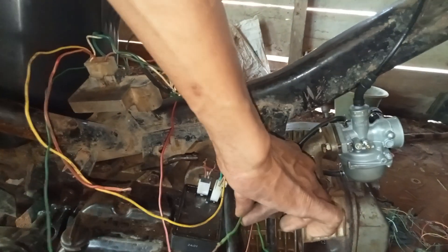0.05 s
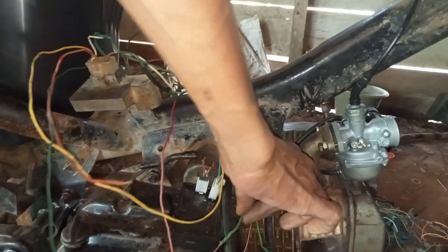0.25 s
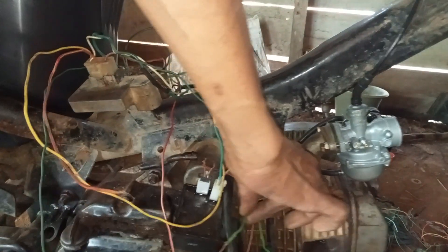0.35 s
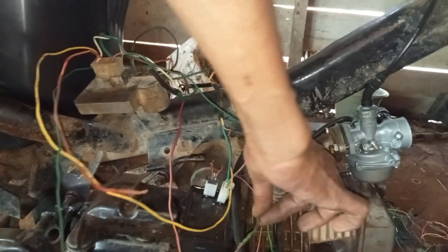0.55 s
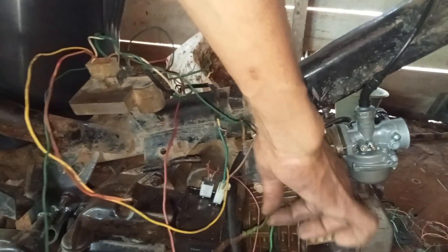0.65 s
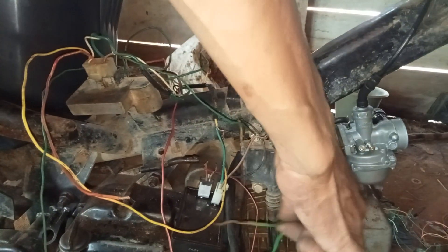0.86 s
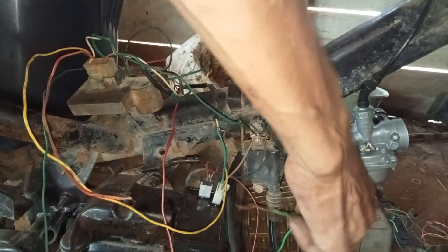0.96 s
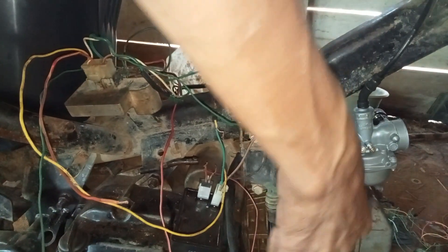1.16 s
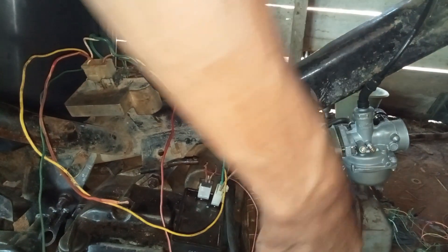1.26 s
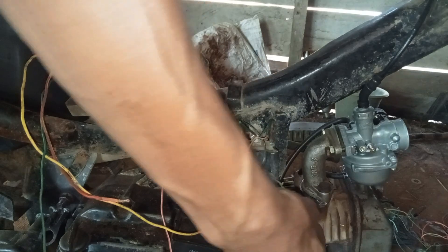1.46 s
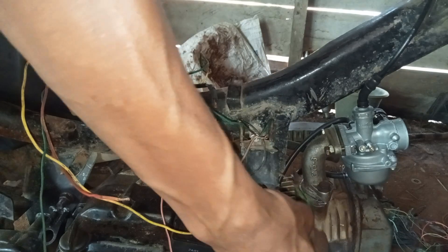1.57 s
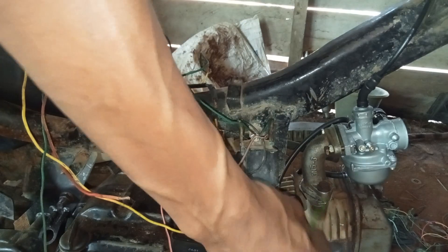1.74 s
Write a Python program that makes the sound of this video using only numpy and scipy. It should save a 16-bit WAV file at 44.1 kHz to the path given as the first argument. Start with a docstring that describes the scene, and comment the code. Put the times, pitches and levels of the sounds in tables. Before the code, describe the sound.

A hand rubs and scrapes on motorcycle parts close to the microphone, with a light tap at 0.1 s and the strongest dull scuffing from 0.25 to 0.45 s. Quick bright swishes come at 0.27 and 0.44 s, clicks with hollow pops at 0.46, 0.57 and 0.72 s. A faint knock follows near 1 s, soft brushing around 1.6 s. Crickets and a thin high whine continue throughout in quiet shed air.

```python
"""A hand works among the wires of a stopped motorcycle in an open shed, close to the microphone.
Shaped friction noise rubs and hisses, wobbling whistles swish, and noisy arched tones squeak twice.
Clicks tick, decaying sines and noise make hollow pops and light knocks, and a low sine thrums.
Behind the hand, narrow noise bands make an unbroken insect chorus, a thin high whine wavers
on a few sine partials, and soft noise is the still air; both channels are alike."""
import sys
import numpy as np
from scipy import signal
from scipy.fft import rfft, irfft
from scipy.io import wavfile

SR = 44100
rng = np.random.default_rng(int(sys.argv[2]) if len(sys.argv) > 2 else 0)


def bounce(signal):
    """Save signal as a 16-bit WAV file at the path given by the first command-line argument."""
    frames = np.transpose(np.atleast_2d(signal))
    limited = np.clip(frames, -1, 1)
    pcm = np.round(limited * 32767).astype(np.int16)
    wavfile.write(sys.argv[1], SR, pcm)


N = 79380
T = np.arange(N) / SR  # s

# dull rubbing of the hand, close: t/s, level/dB
RUB_LEVEL = [(0, -46), (.08, -57.5), (.15, -50), (.185, -54.5), (.215, -47.5), (.245, -36), (.385, -31),
             (.425, -35), (.485, -40), (.528, -39.5), (.545, -47.5), (.562, -47), (.58, -44), (.62, -43.5),
             (.71, -43.5), (.79, -50), (.875, -51.5), (.93, -64), (1.1, -67), (1.22, -100)]
# its spectrum: f/Hz, relative level/dB (per Hz, as in all noise spectra here)
RUB_COLOUR = [(60, -23), (120, -4.5), (170, -5), (230, -3.5), (360, -4), (480, -2.5), (700, 3),
              (1000, -2.5), (1450, -4), (1950, -11), (3300, -8), (5000, -16.5), (9000, -22)]
# dry hiss of sliding skin: t/s, level/dB
HISS_LEVEL = [(0, -49.5), (.06, -72), (.14, -60), (.19, -45), (.235, -49.5), (.27, -42), (.325, -42.5),
              (.37, -36), (.42, -40.5), (.465, -40.5), (.495, -38), (.535, -38.5), (.543, -56), (.563, -70),
              (.572, -42), (.605, -45), (.65, -54), (.685, -44.5), (.73, -57), (.77, -50.5), (.81, -61),
              (.95, -84)]
# its spectrum: f/Hz, relative level/dB
HISS_COLOUR = [(2500, -2.5), (5200, -15.5), (7400, -2), (8500, -2.5), (9600, 0.5), (10600, -8),
               (12500, -5.5), (14200, -20), (15500, -2), (16500, -23)]
# a later light brush of the hand: t/s, level/dB
BRUSH_LEVEL = [(1.42, -100), (1.47, -84), (1.5, -62), (1.53, -71), (1.585, -67.5), (1.607, -56),
               (1.65, -61.5), (1.695, -58.5), (1.73, -64.5), (1.8, -82)]
# its spectrum: f/Hz, relative level/dB
BRUSH_COLOUR = [(100, -7.5), (500, -2), (900, -6.5), (1600, -1.5), (3800, -5.5), (7000, -9), (14000, -26.5)]
# slips: rate, mean excess of their size, share of the friction's power
GRAINS_PER_S, GRAIN_SPREAD_DB, GRAIN_SHARE = 1800, 3, .55
# uneven contact: rms swing in each half octave, and its pace
PATCHY_DB, PATCHES_HZ = 2.5, 14.6
# short scuffs: t/s, half length/s, centre f/Hz, width of each filter pass/Hz, level/dB
SCUFFS = [(0.037, .025, 588, 344, -57), (0.198, 0.033, 324, 220, -42), (0.253, 0.011, 316, 197, -32.5),
          (0.516, 0.0057, 2760, 3460, -35.5), (0.516, 0.011, 418, 196, -41.5),
          (0.641, 0.01, 493, 495, -46.5), (.708, 0.0052, 604, 222, -37), (0.823, 0.0039, 2500, 3000, -54),
          (0.867, 0.0017, 8500, 4500, -44), (0.879, 0.021, 510, 586, -54.5), (0.926, 0.06, 200, 130, -57),
          (1.038, 0.11, 3010, 704, -65), (1.136, 0.045, 190, 150, -69.5)]

# low thrum of the rubbed body: t/s, level/dB
THRUM_LEVEL = [(0, -52.5), (.07, -73.5), (.13, -59.5), (.24, -47), (.27, -61), (.3, -37.5), (.35, -57),
               (.38, -50), (.415, -36.5), (.45, -48.5), (.53, -48), (.56, -63), (.7, -81), (.8, -70),
               (.87, -56.5), (.96, -63), (1.2, -85)]
THRUM_HZ, THRUM_WANDER_HZ, THRUM_PACE_HZ = 160.6, 5.4, 41  # centre, rms pitch wander, its pace
# soft bumps: t/s, half length/s, f/Hz, level/dB
BUMPS = [(0.873, 0.023, 108.2, -53), (1.195, 0.024, 99, -69), (1.49, .018, 100, -59),
         (1.77, 0.033, 230.6, -65)]

# quick swishes: t/s, half length/s, centre f/Hz, level/dB
SWISHES = [(0.2721, 0.0058, 7320, -20), (0.309, .009, 7420, -29.5), (.341, .002, 9630, -30),
           (0.35, 0.0032, 9620, -29.5), (0.395, 0.0061, 7400, -27.5), (0.4416, 0.0054, 7610, -15.5),
           (0.447, 0.0032, 7740, -19.5), (0.478, 0.012, 7400, -36), (0.691, 0.019, 7200, -48)]
# whistles within each swish: ratio to the centre, wobble rate/Hz, relative level/dB
SWISH_MODES = [(.85, 585, -7), (.93, 400, -3), (1.002, 348, 4.5), (1.05, 301, -4), (1.19, 302, -10.5),
               (1.29, 402, -27)]
# hiss around the whistles: f/Hz, relative level/dB
SWISH_COLOUR = [(2000, -6.5), (5000, -7.5), (7500, -2.5), (9600, 3), (11000, -12), (14000, -13),
                (15700, -8)]
SWISH_HISS_DB, SWISH_RISE_HZ_PER_S = -8.5, 8700  # hiss against whistles; glide of the centre

# faint squeaks: t/s, top f/Hz, level/dB
SQUEAKS = [(0.195, 14850, -47), (0.763, 15500, -46.5)]
SQUEAK_HALF_S, SQUEAK_SAG_HZ = .02, 2360  # the pitch is down by the sag one half length from the top
SQUEAK_ROUGHNESS_HZ = 340  # pace of the loudness wobble

# sharp ticks: t/s, drive level before the colour/dB
TICKS = [(0.456, -11.5), (.5635, -11), (0.7169, -26.5)]
# their filter: f/Hz, gain/dB
TICK_COLOUR = [(500, -14), (1800, -9.5), (3800, 4), (6000, -7), (9500, 9), (12500, -4), (16000, 4.5)]
TICK_TAIL_DB, TICK_T60_S = -10.5, 0.022
# hollow pops just after the ticks: t/s, f/Hz, level/dB, ring T60/s
POPS = [(.4595, 714, -20, 0.034), (.569, 1677, -23, 0.034), (.7252, 702, -15.5, 0.036)]
# filter of their thud: f/Hz, gain/dB
POP_COLOUR = [(200, -24), (700, -12), (1400, 3.5), (2200, -23), (5000, -35)]
POP_RISE_S, POP_THUD_DB, POP_THUD_T60_S = 0.0012, 1.5, 0.022
# a light knock: t/s, level/dB
KNOCKS = [(.987, -44)]
# modes of the knocked part: f/Hz, relative level/dB, T60/s
KNOCK_MODES = [(806, -15, .12), (944, -14, .07), (1090, -9, .06), (1184, -9, 0.23), (1333, -7, 0.088),
               (1444, -2.5, 0.13), (1520, -6, .1), (1599, -18.5, 0.36)]
# a smaller part pings: t/s, level/dB
PINGS = [(.112, -42)]
# modes of the smaller part: f/Hz, relative level/dB, T60/s
PING_MODES = [(1060, 0, 0.079), (1690, 1.5, 0.076), (1870, -11, 0.032)]
# filter of the crack in knock and ping: f/Hz, gain/dB
KNOCK_COLOUR = [(300, -9), (650, -8), (850, 4), (1450, -5), (2200, -15), (4500, -21), (8000, -45)]
KNOCK_CRACK_DB, KNOCK_CRACK_T60_S = 10.5, 0.052

# cricket chorus behind the hand: t/s, level/dB
CRICKET_LEVEL = [(0, -42.5), (.28, -37.5), (.55, -47), (.75, -46), (.87, -43.5), (1.15, -40.5),
                 (1.22, -46.5), (1.33, -39), (1.5, -44), (1.57, -40.5), (1.67, -43.5), (1.8, -40.5)]
# its song band: f/Hz, relative level/dB
CRICKET_COLOUR = [(4150, -31.5), (4330, -14), (4420, 2), (4500, 5.5), (4680, 0.5), (4770, -8), (4880, -28)]
# fainter insects farther off: f/Hz, width of each filter pass/Hz, level/dB
FAR_INSECTS = [(3620, 300, -68), (5290, 450, -63.5), (7030, 750, -64), (8200, 270, -77), (9500, 1500, -68)]

# thin whine: t/s, fundamental f/Hz, level/dB
WHINE = [(0, 1640, -52), (.1, 1640, -73), (.3, 1677, -52), (.7, 1625, -60), (.805, 1620, -65),
         (.825, 1630, -56.5), (.89, 1636, -57.5), (1.01, 1630, -61.5), (1.06, 1634, -63.5),
         (1.24, 1635, -62), (1.32, 1636, -57.5), (1.49, 1630, -57), (1.531, 1615, -60), (1.59, 1620, -56.5),
         (1.66, 1614, -63.5), (1.71, 1630, -57), (1.78, 1635, -58)]
# its partials: multiple of the fundamental, relative level/dB
WHINE_PARTIALS = [(4, -14.5), (6, -5.5), (8, 1.5)]
# faint lines beside the strongest partial: offset/Hz, level/dB
WHINE_NEIGHBOURS = [(-330, -68), (374, -77)]
WHINE_JITTER, WHINE_FLUTTER_DB = 0.00093, 2.5  # rms share of the pitch; rms swing of each partial
# partials of the whine that swell briefly by themselves: t/s, half length/s, f/Hz, level/dB
WHINE_SWELLS = [(1.116, 0.039, 11320, -71), (1.276, 0.04, 11370, -68), (1.307, .02, 3275, -70),
                (1.5, 0.038, 11430, -67), (1.523, 0.032, 3250, -65), (1.63, 0.05, 11470, -68),
                (1.745, 0.027, 3240, -68), (1.76, .03, 11470, -72)]
SWELL_JITTER = .0015  # rms share of the pitch

# still air of the shed: f/Hz, relative level/dB
AIR_COLOUR = [(25, -27), (55, -12.5), (98, 2.5), (150, -4.5), (260, -13), (500, -13), (750, -16.5),
              (1200, -20.5), (2300, -24.5), (3200, -19), (6000, -25), (11000, -29), (14500, -23.5),
              (16000, -32)]
AIR_DB = -63
CUTOFF_HZ = 15800


def rubbing():
    """Friction gives a dull scuffing, a dry hiss and a later light brush."""
    layers = [(RUB_LEVEL, RUB_COLOUR), (HISS_LEVEL, HISS_COLOUR), (BRUSH_LEVEL, BRUSH_COLOUR)]
    return sum(level(curve) * rms_one(colour(patchy(friction()), spectrum))
               for curve, spectrum in layers)


def friction():
    """Tiny slips of uneven size on a bed of smooth noise."""
    size_db = GRAIN_SPREAD_DB * np.minimum(rng.exponential(1, N), 5)
    sizes = from_db(size_db) * rng.choice([-1, 1], N)
    slips = rms_one(sizes * (rng.random(N) < GRAINS_PER_S / SR))
    bed = rng.standard_normal(N)
    return np.sqrt(GRAIN_SHARE) * slips + np.sqrt(1 - GRAIN_SHARE) * bed


def patchy(x):
    """The contact keeps changing, so each half octave swells and fades by itself."""
    half_octave = 2 * np.log2(np.fft.rfftfreq(N, 1 / SR) + 1)
    spectrum = rfft(x)
    out = np.zeros(N)
    for k in range(10, 30):
        # neighbouring triangles overlap and add up to one
        part = irfft(spectrum * np.maximum(1 - np.abs(half_octave - k), 0), N)
        out += part * from_db(PATCHY_DB * drift(PATCHES_HZ))
    return out


def scuffs():
    """Brief grazes, each with the colour of the part touched."""
    return sum(from_db(db) * swell(s, half_s) * band(friction(), hz, width_hz)
               for s, half_s, hz, width_hz, db in SCUFFS)


def thrum():
    """The rubbed body hums at one low, wandering resonance and takes a few soft bumps."""
    hum = level(THRUM_LEVEL) * sine(THRUM_HZ + THRUM_WANDER_HZ * drift(THRUM_PACE_HZ))
    bumps = sum(from_db(db) * swell(s, half_s) * sine(hz) for s, half_s, hz, db in BUMPS)
    return np.sqrt(2) * (hum + bumps)


def swishes():
    """Fast slides of skin or wire give brief clusters of rough, rising whistles in hiss."""
    hiss = from_db(SWISH_HISS_DB) * noise(SWISH_COLOUR)
    # complex wobbles make each whistle waver in loudness and phase
    wobbles = [(ratio, from_db(db) * (drift(rate_hz) + 1j * drift(rate_hz)))
               for ratio, rate_hz, db in SWISH_MODES]
    out = np.zeros(N)
    for s, half_s, hz, db in SWISHES:
        phase = 2 * np.pi * np.cumsum(hz + SWISH_RISE_HZ_PER_S * (T - s)) / SR
        shape = swell(s, half_s)
        near = shape > 1e-3
        cluster = sum(wobble[near] * np.exp(1j * ratio * phase[near]) for ratio, wobble in wobbles)
        whistle = np.zeros(N)
        whistle[near] = rms_one(cluster.real)
        burst = shape * (whistle + hiss)
        # give the burst the energy of its envelope
        out += from_db(db) * burst * np.sqrt(np.sum(shape ** 2) / np.sum(burst ** 2))
    return out


def squeaks():
    """Breathy squeaks that rise and fall with the speed of the slide."""
    out = np.zeros(N)
    for s, top_hz, db in SQUEAKS:
        away = np.minimum(((T - s) / SQUEAK_HALF_S) ** 2, 4)
        tone = sine(top_hz - SQUEAK_SAG_HZ * away)
        envelope = np.exp(-.5 * away ** 2)
        out += from_db(db) * envelope * np.sqrt(2) * drift(SQUEAK_ROUGHNESS_HZ) * tone
    return out


def ticks():
    """Each tick is one sharp snap, a single impulse, with a very short noisy tail."""
    out = np.zeros(N)
    for s, db in TICKS:
        out += from_db(db + TICK_TAIL_DB) * decay(s, TICK_T60_S) * rng.standard_normal(N)
        out[int(s * SR)] += 2 * from_db(db)
    return colour(out, TICK_COLOUR)


def pops():
    """A soft thud, and a small pocket of air that builds up quickly and rings for a short while."""
    out = np.zeros(N)
    for s, hz, db, t60 in POPS:
        age = np.maximum(T - s, 0)
        build_up = 1 - np.exp(-age / POP_RISE_S)
        ring = build_up * decay(s, t60) * np.sin(2 * np.pi * hz * age)
        thud = colour(decay(s, POP_THUD_T60_S) * rng.standard_normal(N), POP_COLOUR)
        out += from_db(db) * (ring + from_db(POP_THUD_DB) * thud)
    return out


def knocks():
    """Two small parts are nudged, and each rings in its own modes."""
    return struck(KNOCKS, KNOCK_MODES) + struck(PINGS, PING_MODES)


def struck(hits, modes):
    """Light contacts: a dull crack and a few short modes."""
    out = np.zeros(N)
    for s, db in hits:
        rings = sum(from_db(mode_db) * decay(s, t60) * np.sin(2 * np.pi * hz * (T - s))
                    for hz, mode_db, t60 in modes)
        crack = colour(decay(s, KNOCK_CRACK_T60_S) * rng.standard_normal(N), KNOCK_COLOUR)
        out += from_db(db) * (rings + from_db(KNOCK_CRACK_DB) * crack)
    return out


def crickets():
    """A chorus as one narrow noise band; others sing farther off in fainter bands."""
    chorus = level(CRICKET_LEVEL) * noise(CRICKET_COLOUR)
    far = sum(from_db(db) * band(rng.standard_normal(N), hz, width_hz)
              for hz, width_hz, db in FAR_INSECTS)
    return chorus + far


def whine():
    """A thin, slightly unsteady tone, strongest in a high partial; others swell briefly alone."""
    s, hz, db = np.transpose(WHINE)
    pitch = np.interp(T, s, hz) * (1 + WHINE_JITTER * drift(150))
    tone = sum(from_db(part_db + WHINE_FLUTTER_DB * drift(37)) * sine(multiple * pitch)
               for multiple, part_db in WHINE_PARTIALS)
    strongest_hz = WHINE_PARTIALS[-1][0] * pitch
    beside = sum(from_db(line_db) * drift(40) * sine(strongest_hz + offset_hz)
                 for offset_hz, line_db in WHINE_NEIGHBOURS)
    waver = 1 + SWELL_JITTER * drift(100)
    swells = sum(from_db(swell_db) * swell(at_s, half_s) * sine(swell_hz * waver)
                 for at_s, half_s, swell_hz, swell_db in WHINE_SWELLS)
    return np.sqrt(2) * (from_db(np.interp(T, s, db)) * tone + beside + swells)


def still_air():
    """The still air of the shed: steady, soft noise."""
    return from_db(AIR_DB) * noise(AIR_COLOUR)


def from_db(db):
    """Decibels to gain."""
    return 10 ** (np.asarray(db) / 20)


def rms_one(x):
    """Scale to unit rms."""
    return x / np.sqrt(np.mean(x ** 2) + 1e-20)


def level(rows):
    """Gain over time from (t/s, level/dB) rows."""
    return from_db(np.interp(T, *np.transpose(rows)))


def colour(x, points):
    """Filter by a spectrum of (f/Hz, gain/dB) points; falls away beyond its ends."""
    hz, db = np.transpose(points)
    log_f = np.log(np.fft.rfftfreq(2 * N, 1 / SR) + 1)
    log_points = np.log(hz)
    beyond = np.abs(log_f - np.clip(log_f, log_points[0], log_points[-1]))
    gain = from_db(np.interp(log_f, log_points, db) - 60 * beyond)
    return irfft(rfft(x, 2 * N) * gain)[:N]


def noise(points):
    """Unit-rms noise with the given spectrum."""
    return rms_one(colour(rng.standard_normal(N), points))


def drift(rate_hz):
    """Random wander of unit rms, mostly slower than the given rate."""
    f = np.fft.rfftfreq(N, 1 / SR)
    return rms_one(irfft(rfft(rng.standard_normal(N)) / (1 + (f / rate_hz) ** 2), N))


def resonate(x, hz, width_hz):
    """One two-pole resonance with a gain of about 1 at its peak."""
    r = np.exp(-np.pi * width_hz / SR)
    zeros = np.array([1, 0, -1]) * (1 - r * r) / 2
    poles = [1, -2 * r * np.cos(2 * np.pi * hz / SR), r * r]
    return signal.lfilter(zeros, poles, x)


def band(x, hz, width_hz):
    """A resonance applied twice for steep skirts; unit rms."""
    return rms_one(resonate(resonate(x, hz, width_hz), hz, width_hz))


def sine(hz):
    """A sine of random phase that follows a fixed pitch or a pitch curve."""
    return np.sin(2 * np.pi * (np.cumsum(hz + 0 * T) / SR + rng.random()))


def swell(s, half_s):
    """A bell-shaped envelope centred on s."""
    return np.exp(-.5 * ((T - s) / half_s) ** 2)


def decay(s, t60):
    """An envelope that starts at s and falls by 60 dB in t60 seconds."""
    return (T >= s) * from_db(-60 * np.maximum(T - s, 0) / t60)


def scene():
    """Close hand and the background behind it, the same in both channels."""
    hand = rubbing() + scuffs() + thrum() + swishes() + squeaks() + ticks() + pops() + knocks()
    background = crickets() + whine() + still_air()
    mono = hand + background
    return np.array([mono, mono])


def record(dry):
    """A steep elliptic low-pass cuts the top at the microphone."""
    lowpass = signal.ellip(10, .2, 80, CUTOFF_HZ, fs=SR, output="sos")  # ripple/dB, stopband/dB
    return signal.sosfilt(lowpass, dry)


dry = scene()
out = record(dry)
bounce(out)
```